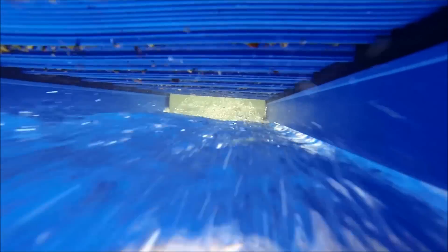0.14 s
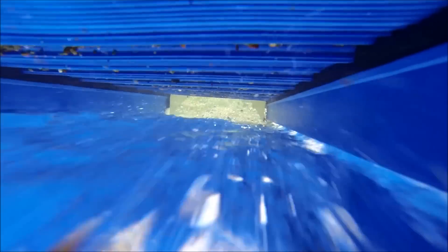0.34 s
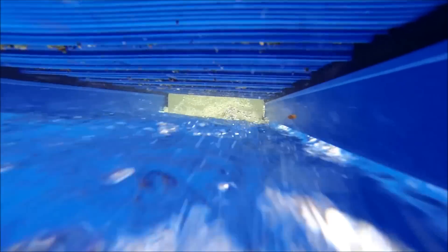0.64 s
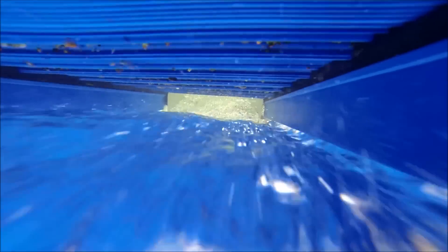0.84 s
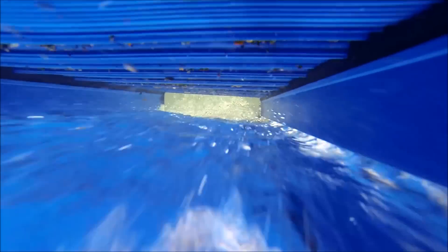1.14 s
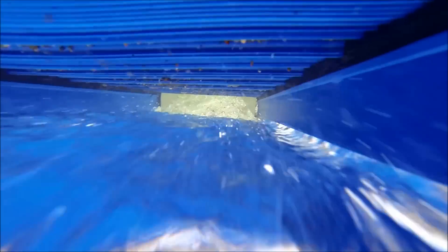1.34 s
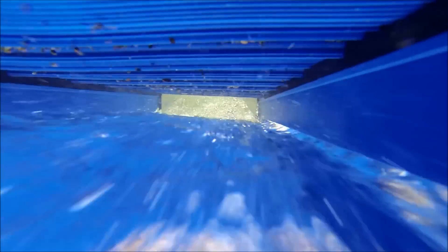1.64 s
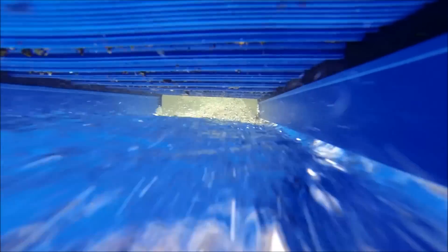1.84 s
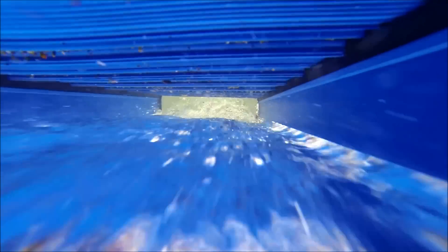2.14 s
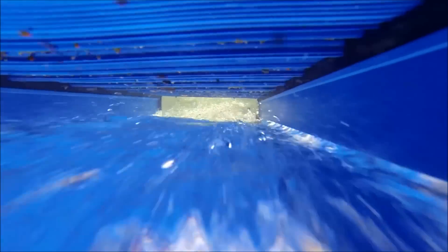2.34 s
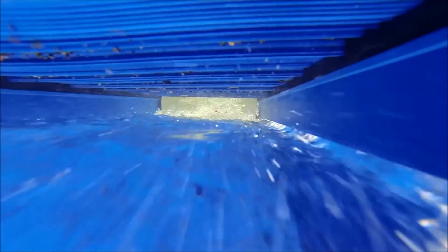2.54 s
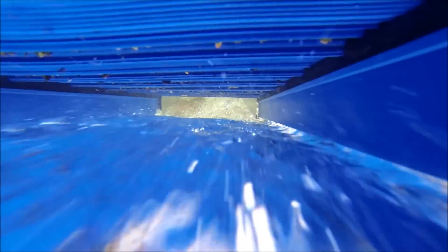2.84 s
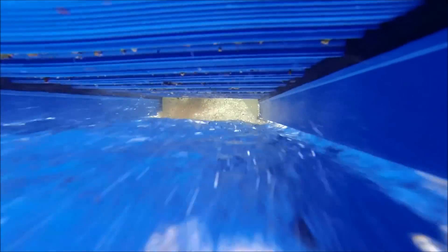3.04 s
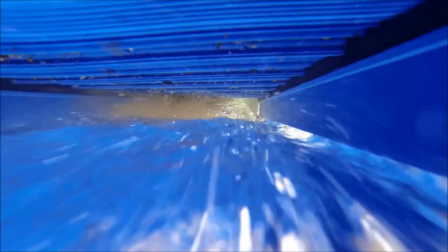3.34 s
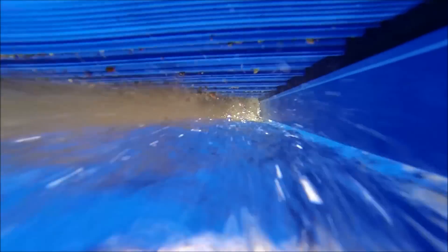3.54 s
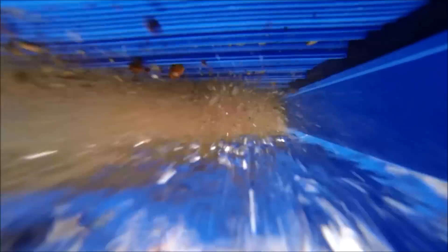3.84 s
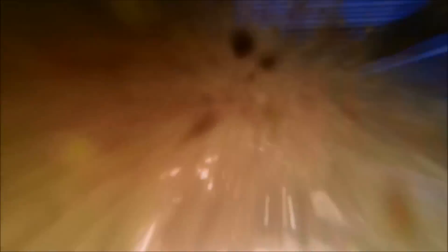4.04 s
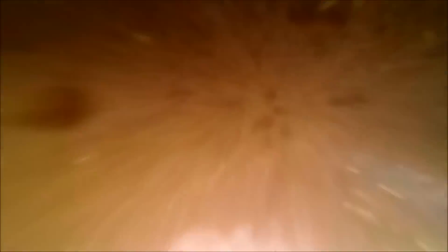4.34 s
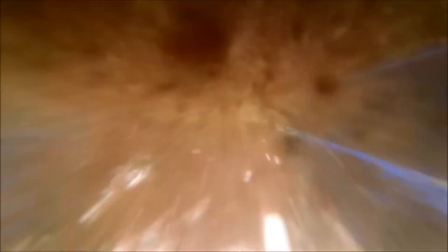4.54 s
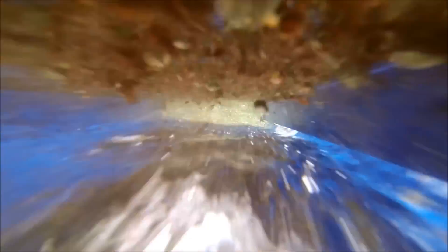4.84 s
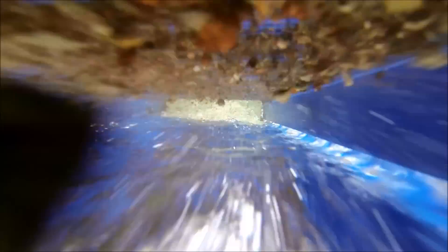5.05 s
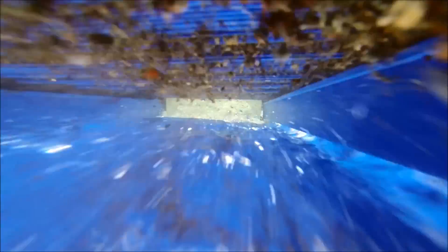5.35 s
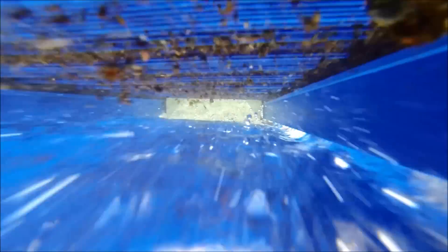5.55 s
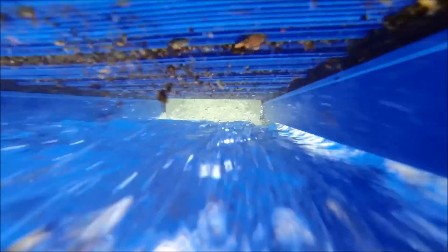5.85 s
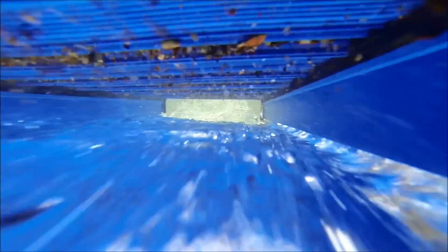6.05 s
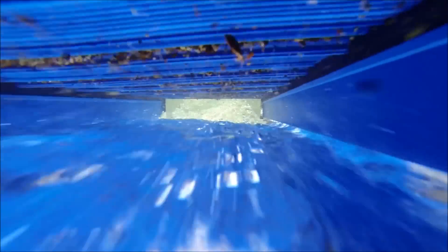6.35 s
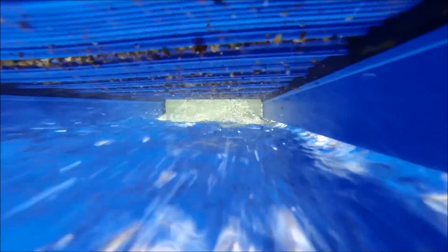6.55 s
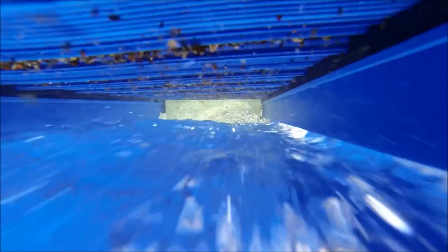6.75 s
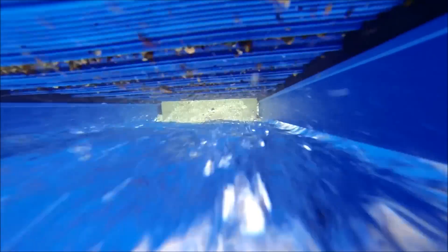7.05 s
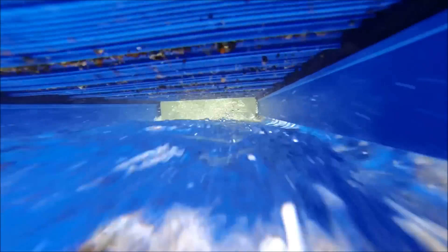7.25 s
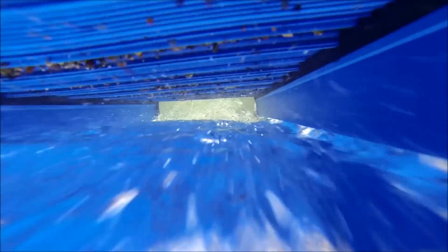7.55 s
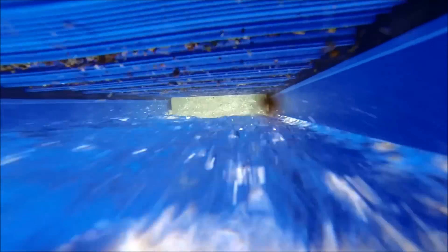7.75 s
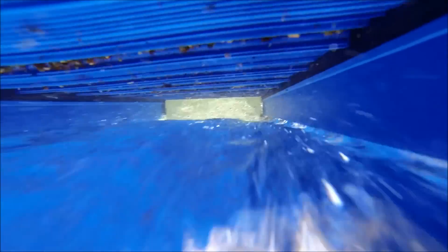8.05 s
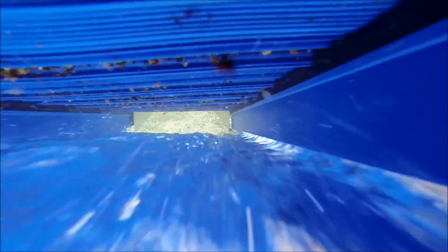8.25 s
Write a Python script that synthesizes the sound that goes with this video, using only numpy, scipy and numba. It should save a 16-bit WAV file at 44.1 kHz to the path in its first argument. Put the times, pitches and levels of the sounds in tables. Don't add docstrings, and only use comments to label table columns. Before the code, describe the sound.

Steady gurgling torrent over fizzing sand, then a burst of hard stone knocks against a sealed housing, then ever louder bubble bursts.

```python
import sys
import numpy as np
from scipy import signal
from scipy.fft import rfft, irfft, next_fast_len
from scipy.io import wavfile
from scipy.ndimage import uniform_filter1d, map_coordinates
from numba import njit

SR = 44100
rng = np.random.default_rng(int(sys.argv[2]) if len(sys.argv) > 2 else 0)


def digitize_waveform(pressure):
    field = np.atleast_2d(pressure).T
    bounded = np.clip(field, -1, 1)
    quanta = np.round(bounded * 32767).astype(np.int16)
    wavfile.write(sys.argv[1], SR, quanta)


def voltage_ratio(level):
    return 10 ** (np.asarray(level, float) / 20)


N = 370437

# frequency in Hz, level in dB per Hz.
CASE_COLOUR = [(350, -31), (600, -9), (843, -1.5), (1440, 1.5), (1950, -10.5), (2340, -10), (2740, -17.5),
               (3280, -16), (4900, -37), (7860, -45), (11700, -47.5), (19800, -120)]
# frequency in Hz, level in dB per Hz.
GRIT_COLOUR = [(1060, -3.5), (1800, 7.5), (2620, 2.5), (3260, 4), (4450, -6.5), (5010, -4.5), (6960, -14.5),
               (7910, -12.5), (10500, -23.5), (12800, -20.5), (16000, -31)]
# time in seconds, sand load in dB.
SAND_LOAD = [(0, -51.5), (.56, -43), (2.05, -48.5), (2.3, -43), (3.45, -45), (3.85, -51), (3.96, -40),
             (4.3, -35.5), (4.87, -33.5), (5.1, -36.5), (5.76, -39.5), (6.22, -37), (6.97, -41.5),
             (7.39, -38.5), (7.64, -47.5), (7.94, -33), (8.04, -36), (8.4, -38)]


def unit(x):
    return x / np.sqrt(np.mean(x ** 2) + 1e-20)


def wobble(knots_per_s):
    knots = rng.standard_normal(int(N * knots_per_s / SR) + 4)
    return map_coordinates(knots, [np.arange(N) * knots_per_s / SR])


def swing(rows):
    curve = np.interp(np.arange(N) / SR, *np.transpose(rows))
    return curve - curve.mean()


def coloured(x, points):
    m = 2 ** 14
    hz, db = np.transpose(points)
    level = voltage_ratio(np.interp(np.log(np.fft.rfftfreq(m, 1 / SR) + 1), np.log(hz + 1), db))
    cepstrum = irfft(np.log(level + 1e-6), m)
    cepstrum[1:m // 2] *= 2
    cepstrum[m // 2 + 1:] = 0
    impulse = irfft(np.exp(rfft(cepstrum)), m)
    return signal.oaconvolve(x, impulse)[:N]


def mottled(x, patchy_db):
    z = signal.stft(x, nperseg=128)[2]
    field = uniform_filter1d(rng.standard_normal(z.shape), size=6, axis=0)
    field = uniform_filter1d(field, size=3, axis=1)
    return signal.istft(z * voltage_ratio(patchy_db * unit(field)), nperseg=128)[1][:N]


@njit
def rings(n, start, step, gain, cycles, rise, soft, bend):
    out = np.zeros(n)
    for g in range(len(start)):
        for i in range(min(int(4 * cycles[g] / step[g]), n - start[g])):
            u = i * step[g]
            shape = np.exp(-(u / cycles[g]) ** bend) * (1 - np.exp(-u / soft))
            out[start[g] + i] += gain[g] * shape * np.sin(2 * np.pi * u * (1 + rise * u / cycles[g]))
    return out


def struck(rows, cycles, rise, soft, bend):
    s, db, hz = np.transpose(rows)[:3]
    draw = rng.random((len(s), 2))
    gain = voltage_ratio(db) * np.sign(draw[:, 0] - .5)
    length_cycles = cycles * (0.69 + .5 * draw[:, 1])
    return rings(N, (s * SR).astype(np.int64), hz / SR, gain, length_cycles, rise, soft, bend)


def near(rows, hz, spread):
    scatter = rng.uniform(-1.94, 1.84, len(rows))
    return [(s, db, hz * (1 + spread * r)) for (s, db), r in zip(rows, scatter)]


def shower(rate_per_s, low_hz, high_hz, cycles, spread_db, most_db, rise):
    draw = rng.random((int(rate_per_s * N / SR), 3))
    hz = low_hz * (high_hz / low_hz) ** draw[:, 1]
    size_db = np.minimum(-spread_db * np.log(draw[:, 2] + 1e-9), most_db) + 20 * np.log10(hz)
    rows = np.transpose([draw[:, 0] * N / SR, size_db, hz])
    return unit(struck(rows, cycles, rise, soft=0.41, bend=0.96))


def bursts(rows, decay_s):
    blows = np.bincount([round(r[0] * SR) for r in rows], [voltage_ratio(r[1]) for r in rows], N)[:N]
    envelope = signal.lfilter([1], [1, -np.exp(-1 / (decay_s * SR))], blows)
    return envelope * np.sign(rng.standard_normal(N))


def turbulence():
    # time in seconds, turbulence in dB.
    flow = [(0.0, -24), (0.63, -18), (1.19, -20.5), (1.85, -20), (2.03, -21.5), (2.32, -18.5), (2.5, -20),
            (4.37, -16.5), (4.58, -17), (4.91, -15.5), (5.05, -19.5), (5.21, -21.5), (5.54, -18),
            (5.76, -21), (5.96, -18), (6.29, -17), (8.21, -18.5), (8.4, -19.5)]
    return swing(flow)


def gravel_bar():
    t = np.arange(N) / SR
    start_s, end_s, rise_s, fall_s = 4.55, 6.22, 0.15, 0.58
    return np.clip(np.minimum((t - start_s) / rise_s, (end_s - t) / fall_s) + .5, 0, 1)


def splashes():
    draw = rng.random((int(70 * N / SR), 2))
    rows = np.transpose([draw[:, 0] * (N - 1) / SR, 14 * draw[:, 1] ** 2])
    return unit(bursts(rows, decay_s=0.0026))


def buffeting(flow_db, bar, surge, heave):
    # frequency in Hz, level in dB per Hz.
    eddy_colour = [(8.8, -23), (15, 2), (37, 0), (81, -5), (145, -14.5), (242, -26.5), (390, -37),
                   (660, -120)]
    rumble = coloured(rng.standard_normal(N), eddy_colour)
    eddies = unit(voltage_ratio(1.44 * heave + 1.0 * surge) * rumble)
    return voltage_ratio(-21 + 0.99 * flow_db - 5 * bar) * eddies


def sloshing(flow_db, bar, surge, heave, splash):
    # frequency in Hz, level in dB per Hz.
    slosh_colour = [(76, -32), (130, -6.5), (242, -7.5), (650, -4), (840, -44), (1430, -120)]
    pockets = shower(400, 100.0, 867, 1.27, spread_db=2.0, most_db=13.0, rise=0.061)
    pockets = pockets + 0.9 * rng.standard_normal(N) + 2.06 * splash
    slosh = unit(voltage_ratio(0.53 * heave + 2.4 * surge) * coloured(pockets, slosh_colour))
    return voltage_ratio(-24 + 0.46 * flow_db - 6 * bar) * slosh


def gurgling(flow_db, bar, surge, heave, splash):
    froth = shower(1800, 413.0, 10640, 4.52, spread_db=2.5, most_db=8.5, rise=0.0554)
    froth = froth + 0.6 * rng.standard_normal(N) + 0.53 * splash
    flutter_db = 0.39 * heave + 1.8 * surge + 1.07 * wobble(90)
    bubbles = unit(voltage_ratio(flutter_db) * coloured(froth, CASE_COLOUR))
    bubbles = bubbles - 0.5 * bar * signal.filtfilt(*signal.butter(2, 950, fs=SR), bubbles)
    return voltage_ratio(-14.5 + flow_db - 0.3 * bar) * bubbles


def drifting_sand(surge, splash):
    sand_db = -40.5 + 0.99 * swing(SAND_LOAD)
    thick = np.clip((sand_db + 46.0) / 14, .15, 1)
    hits = rng.random((int(650 * N / SR), 2))
    size_db = np.minimum(-6.5 * np.log(hits[:, 1] + 1e-9), 14)
    rows = np.transpose([hits[:, 0] * (N - 1) / SR, size_db])
    cracks = unit(mottled(bursts(rows, decay_s=0.00044), patchy_db=4))
    fizz = shower(450, 2890, 17500, 7.9, spread_db=11.5, most_db=24.0, rise=0.044)
    drops = shower(90, 3086, 8500, 8.5, spread_db=6.5, most_db=10.0, rise=0.013)
    sand = 1.8 * thick * cracks + (1 - 0.7 * thick) * (1.5 * fizz + 0.86 * drops)
    sand = sand + (0.13 + 0.25 * thick) * rng.standard_normal(N) + 0.095 * splash
    sand = unit(voltage_ratio(1.36 * surge) * coloured(sand, GRIT_COLOUR))
    return voltage_ratio(sand_db + 11.0) * sand


def water():
    flow_db, bar, splash = turbulence(), gravel_bar(), splashes()
    surge, heave = wobble(25), wobble(11)
    low = buffeting(flow_db, bar, surge, heave) + sloshing(flow_db, bar, surge, heave, splash)
    return low + gurgling(flow_db, bar, surge, heave, splash) + drifting_sand(surge, splash)


def lesser_bubbles():
    # start in seconds, peak in dB, pitch in Hz.
    blips = [(0.3236, -6, 1270), (0.4015, -7, 1330), (0.5074, -0.5, 1460), (0.8458, -9, 1480),
             (0.8608, -13, 1370), (1.0057, -2, 1240), (1.1233, -10, 1320), (1.4343, -9, 710),
             (1.5258, -4, 1310), (1.5341, -2, 1390), (1.8323, -7, 1340), (1.9378, -13, 1040),
             (1.9763, -3, 1160), (2.0484, -2, 930), (2.1925, -1, 1280), (2.2309, -2, 1310),
             (2.5259, -7, 1500), (2.5372, -6, 1180), (2.7679, -3, 1233), (2.8774, -11, 1040),
             (2.9031, -10, 1300), (3.0326, -7.5, 1596), (3.0612, -6, 830), (3.3625, -5, 1350),
             (3.6904, -3, 1390), (3.7741, -9, 1327), (3.8377, -9, 1520), (4.0962, 2, 1320),
             (4.5591, 0, 1550), (5.0368, -1, 1500), (4.9655, -2, 1200), (5.0722, -6, 1500),
             (5.3164, -8, 1520), (5.4015, -12, 1460), (5.4752, -3, 1670), (5.7442, -2, 1500),
             (5.8697, -6, 1300), (6.1295, -10, 1270), (6.359, -5, 1560), (6.6197, -1, 1022),
             (7.0508, 0, 945), (5.6105, -7, 1200), (7.4424, -7, 929), (7.8085, -6, 1170),
             (7.9373, -5, 1460), (8.0578, -4, 1400), (8.0656, -3, 1570), (8.1995, -2, 1230),
             (8.3178, -5, 1220), (8.3285, 1.5, 1429)]
    # start in seconds, peak in dB, pitch in Hz.
    glugs = [
        (0.4377, -9, 715),
        (0.7547, -6.5, 640),
        (0.9895, -17, 423),
        (2.3813, -9, 644),
        (4.9011, -17, 407),
        (5.3949, -19, 510),
        (5.7033, 10.5, 1230),
        (6.8606, -14, 370),
        (6.9831, -13, 507),
        (8.3078, -11, 710),
    ]
    blip_rings = voltage_ratio(5.5) * struck(blips, 4.05, rise=0.0074, soft=1.0, bend=1.36)
    return blip_rings + voltage_ratio(6.0) * struck(glugs, 3.1, rise=0.022, soft=0.9, bend=2.2)


def fine_grit():
    # start in seconds, peak in dB, pitch in Hz.
    taps = [(0.0802, -11, 1800), (0.1224, -13, 1900), (0.3838, -7, 2610), (0.5939, -13, 2150),
            (1.3448, -5.5, 2070), (1.4239, -11, 2100), (1.4625, -14.2, 2200), (1.5991, -12, 2450),
            (1.6526, -4, 2190), (1.8579, -7, 2300), (1.893, -2, 1890), (2.1264, -9, 3260),
            (2.6521, -7, 2720), (1.3185, -17, 3080), (3.218, -6, 2300), (3.3001, -8, 2370),
            (3.4091, -7, 1860), (3.6266, -10, 1810), (3.7711, -7, 3000), (4.17, -17, 2400),
            (4.306, -4, 2500), (4.322, -6, 3200), (4.5638, -5, 2270), (4.607, -4, 2337),
            (4.8204, -15, 1810), (4.966, -15, 2630), (5.5204, -14.3, 1810), (5.7802, -8, 1811),
            (5.9549, -7, 1990), (6.1194, -8, 1980), (6.1474, -9, 1840), (6.2158, -7, 1860),
            (6.3163, -14, 2100), (6.3858, -7, 2202), (6.85, -8, 2297), (7.2438, -5, 1800),
            (7.3395, -9, 1840), (7.4072, -14, 2000), (7.4963, -5, 2020), (7.9392, -7, 2060)]
    # start in seconds, peak in dB, pitch in Hz.
    grains = [(0.3784, -21, 3910), (0.4019, -21, 4050), (0.782, -19, 4040), (0.9045, -15, 3990),
              (1.0023, -23, 3680), (1.1966, -16, 3850), (1.4777, -20, 4930), (1.6867, -21, 4150),
              (1.2445, -15, 4200), (1.8942, -25, 5040), (1.9319, -19.5, 3970), (1.9675, -23.8, 4630),
              (2.2728, -22, 10760), (2.4578, -22, 5340), (2.6532, -16, 4390), (1.353, -25, 5360),
              (3.4417, -19, 4080), (3.7717, -14, 3820), (3.8524, -24, 5270), (3.9317, -20, 4970),
              (3.9404, -21, 3610), (3.9711, -22, 5170), (4.0305, -15, 3620), (4.0474, -18, 4870),
              (4.0601, -16.5, 4970), (4.1227, -17, 3940), (4.1708, -17.5, 4190), (4.243, -18.6, 11600),
              (4.3052, -21, 4040), (4.3294, -14, 4870), (4.3959, -18, 8000), (4.4356, -12, 4890),
              (4.459, -13, 4780), (4.8243, -17, 5350), (4.8738, -15, 3900), (4.9545, -13, 4140),
              (5.0368, -9, 3100), (5.4763, -16, 3610), (5.5314, -20.2, 3880), (5.6371, -6, 3680),
              (5.7814, -14, 3610), (5.8981, -17, 4950), (5.9274, -10, 4150), (6.0984, -12.5, 3980),
              (6.1478, -21, 5000), (6.1632, -17, 4035), (6.2714, -23, 5070), (6.2976, -20, 4270),
              (6.3661, -15, 3700), (6.3874, -14.5, 3680), (6.4242, -16.5, 4960), (6.7762, -12, 4260),
              (6.8844, -16, 4520), (7.1458, -21, 5050), (7.384, -23, 4210), (7.4783, -19, 5140),
              (7.7104, -18.5, 5320), (7.7872, -15, 3610), (7.8926, -17, 4400), (8.0676, -23, 4890)]
    # start in seconds, peak in dB, pitch in Hz.
    glints = [(0.1387, -29, 8030), (0.5596, -29.2, 10000), (2.386, -30, 11500), (5.2915, -19, 12500),
              (7.569, -29, 11500), (7.652, -30, 6000), (4, -25, 12500), (2.2415, -28, 10990),
              (2.3175, -26, 7800), (2.4971, -29.7, 11540), (5.5092, -22, 11700), (7.5375, -26, 12500),
              (7.6615, -34, 14000), (5.3545, -30, 9000), (3.4447, -27, 10690), (3.4583, -29.3, 10720),
              (4.3825, -21, 9000), (4.7335, -20, 11000), (4.5764, -20, 7010), (4.6753, -6.5, 7800),
              (4.2, -21, 10700), (5.7365, -24, 11500), (4.9756, -14.5, 7300), (5.7592, -31, 12800),
              (5.432, -23, 11700), (5.7896, -24, 10500), (5.773, -14, 12400), (5.7815, -28.3, 8100),
              (5.949, -19, 12140), (6.1954, -28, 8100), (6.2024, -23, 9400), (6.227, -24, 7900),
              (6.2865, -23.7, 11070), (6.439, -26, 10600), (7.4152, -22, 10490), (7.7365, -29, 8700),
              (7.7823, -29, 8110), (8.26, -25, 9000)]
    ring = voltage_ratio(5.0) * struck(taps, 5.1, rise=0.004, soft=0.75, bend=0.84)
    ring += voltage_ratio(8.5) * struck(grains, 5.9, rise=0.004, soft=1.3, bend=1.1)
    ring += voltage_ratio(12.5) * struck(glints, 5.2, rise=0.003, soft=1.1, bend=1.8)
    crack = mottled(bursts(grains + glints, decay_s=0.0011), patchy_db=5.5)
    crack_db = 11.5 + 0.47 * np.minimum(swing(SAND_LOAD) - 7.5, 0)
    return ring + voltage_ratio(crack_db) * coloured(crack, GRIT_COLOUR)


def shoves():
    # start in seconds, peak in dB, recovery in seconds.
    pushes = [
        (5.7736, 4.5, 0.0023),
    ]
    out, t = np.zeros(N), np.arange(N) / SR
    for s, db, recovery_s in pushes:
        u = np.maximum(t - s, 0) / recovery_s
        jump = (1 - np.exp(-u * 4)) ** 2
        out -= voltage_ratio(db + 16.5) * jump * (np.exp(-u) - 0.17 * np.exp(-u / 5.1))
    return out


def gravel_strikes():
    # start in seconds, peak in dB, pitch in Hz, crack in dB.
    ticks = [(0.3002, -7, 2540, -28), (0.3774, -2, 2370, -44), (1.104, -7, 2330, -36),
             (1.15, -12, 3220, -27), (1.1654, -5, 2560, -17), (1.1888, -7.5, 3000, -11.5),
             (1.6005, -6, 2480, -21), (2.637, -8, 2440, -24), (2.6466, -7.5, 2535, -10),
             (2.8849, -6, 2600, -17), (3.035, -3.5, 3290, -33), (3.127, -2, 2300, -22),
             (3.152, -5, 2400, -20), (3.208, -4.5, 2370, -41), (3.7595, -6.5, 2820, -33),
             (3.8616, -7, 2400, -31), (4.0043, -5, 3150, -28), (4.0805, -5, 2290, -17),
             (4.2953, -6, 2320, -35), (4.351, -10.5, 2280, -2), (4.572, 5.5, 3020, -20),
             (6.4158, -5.5, 2350, -28), (6.812, -7.5, 2790, -15), (6.987, -7, 2540, -35),
             (7.37, -6.5, 2950, -35), (7.53, -2, 2370, -34), (7.7743, -10, 3400, -15),
             (8.2529, -5, 2550, -9.5), (8.308, -3.5, 3220, -27), (8.3553, -1, 3470, -37)]
    # start in seconds, peak in dB, pitch in Hz.
    sparks = [(.2315, -19, 10500), (.5906, -23.5, 5820), (.6567, -19.5, 7570), (.817, -18.5, 6500),
              (1.0087, -15.5, 6160), (1.097, -23, 5950), (1.1654, -15, 7100), (1.5454, -21, 7750),
              (1.6148, -16, 6000), (1.7074, -18, 5740), (1.8516, -18, 6170), (2.129, -19, 5540),
              (2.5911, -17.5, 6000), (3.0734, -15.5, 7200), (3.3776, -17.5, 7600), (3.594, -20, 5650),
              (3.768, -21, 12500), (3.8088, -22, 7240), (4.3505, -13, 5700), (4.3891, -15, 12000),
              (5.0552, -19, 12500), (4.707, -17, 6270), (4.7245, -7, 6510), (4.9052, -9, 5720),
              (5.1625, -16.5, 5920), (5.302, -14, 12000), (5.5058, -12, 6480), (6.7171, -18.5, 7940),
              (7.5295, -17, 10100), (8.301, -17, 5370)]
    # start in seconds, peak in dB, crack in dB.
    pebbles = [(4.67, -4, -2.5), (4.7255, -14.5, 0), (4.7758, 0, -16.5), (4.922, -6, -10), (4.966, -6, -18),
               (4.99, 9, -17), (5.004, 8.5, -23), (5.045, 7, -16), (5.0621, 9, -28), (5.08, 11, -19.5),
               (5.0916, 8, -30), (5.223, -6, -11), (5.476, 1, -20), (5.522, -10, -10), (5.629, -6.5, -11)]
    # start in seconds, knock, tick and spark in dB.
    stones = [(0.059, -8, -31, -36), (4.641, -11, -10, -15.5), (4.674, -22, -5, -4.5),
              (4.8745, 6.5, -9, -29), (4.954, -22, -4, -18), (4.977, 11, -19, -8), (5.0405, 11.5, -11, -12),
              (5.0658, 8, -1, -14), (5.129, -20, -9, -21), (5.22, -1, -28, -12.5), (5.266, 3.5, -3.5, -13),
              (5.4116, -12, -18, -11), (5.4329, -17, -28, -17), (5.4669, -2, -16, -6),
              (5.5135, -17, -2, -11.5), (5.6378, 3.5, -5, -15), (5.6765, -8, -8, -12),
              (5.702, 13.5, 7.5, -6), (5.729, -25, -25, -17), (5.7422, 3, -3, -22), (5.7737, -3, -7, -2.5),
              (5.802, -2, -8, -16), (5.899, 0, -3, -14), (5.947, -9, -12, -12), (5.964, 7.5, 0, -14),
              (7.0358, 2, -12, -7), (7.0612, 6, -1, -16)]
    knock = near([(r[0], r[1]) for r in stones], 1423, spread=0.05)
    tick = near([(r[0], r[2]) for r in stones], 3100, spread=0.05)
    spark = near([(r[0], r[3]) for r in stones], 5970, spread=0.05)
    ring = voltage_ratio(4.0) * struck(knock, 2.7, rise=0.0077, soft=0.49, bend=3.6)
    ring += voltage_ratio(5.5) * struck([r[:3] for r in ticks] + tick, 4.15, rise=0.0031, soft=0.45, bend=0.86)
    ring += voltage_ratio(3) * struck(sparks + spark, 7, rise=.005, soft=1.5, bend=2)
    bounces = [(s, db, 1450) for s, db, _ in pebbles]
    ring += voltage_ratio(-1.0) * struck(bounces, 3.3, rise=0.01, soft=0.48, bend=1.4)
    snap_s = .0008
    bright = [(s, db + crack_db) for s, db, *_, crack_db in ticks + pebbles]
    snaps = bursts(bright, snap_s) + .5 * bursts(sparks, snap_s) + 0.83 * bursts(spark, snap_s)
    crack = voltage_ratio(18.5) * coloured(mottled(snaps, patchy_db=4), GRIT_COLOUR)
    shaken_case = voltage_ratio(10.5) * coloured(bursts(ticks + tick, decay_s=0.0034), CASE_COLOUR)
    return ring + crack + shaken_case


def bubble_bursts():
    # start in seconds, peak in dB, pitch in Hz.
    gulps = [(.142, -3, 1030), (.149, -1, 840), (.666, 2, 1160), (1.356, -1.5, 1020), (1.421, -3, 1220),
             (1.583, -4.5, 830), (1.939, 0.5, 1040), (2.034, 6, 960), (2.187, 6.5, 880), (2.272, -2, 754),
             (2.315, -1.5, 865), (2.519, -6, 820), (2.725, 1, 794), (2.792, -1, 880), (3.095, 3.5, 1020),
             (3.525, 2, 697), (3.667, 1, 795), (3.823, -2, 1050), (3.863, -2, 1130), (4.556, -6, 1000),
             (6.518, 6, 1057), (6.632, 1.5, 945), (6.653, 2, 810), (6.762, 3, 950), (6.826, 6, 890),
             (7.245, 7.5, 990), (7.527, 3.5, 910), (7.553, -3, 1050), (7.8, 8.5, 870), (7.986, 13, 1010),
             (.995, -4, 1280),
        (2.042, 6.5, 1450),
        (2.242, -2, 1380),
        (5.782, 3, 1530),
    ]
    # start in seconds, peak in dB.
    slaps = [(.081, -2.5), (.169, 8), (.26, 2.5), (.466, 1), (.596, -1), (.869, 4), (1.045, 7.5),
             (1.207, 7), (1.471, 5.5), (.0595, -5), (1.644, 5), (1.731, 5), (1.894, 3.5), (2.233, -4),
             (2.401, 1), (2.413, 7), (2.952, 2), (3.41, 0), (3.628, 7), (3.991, 1.5), (4.326, 3),
             (4.609, 2), (6.425, 2), (6.495, 2), (7.5675, 8.5), (7.5988, 6), (7.7268, 5.5), (8.023, 8),
             (8.101, 11), (8.131, 6)]
    # start in seconds, peak in dB, pitch in Hz.
    plops = [(0.042, -11.5, 430), (0.361, -4, 420), (0.555, -4, 480), (0.843, -3, 464), (1.185, -4, 510),
             (1.755, -7, 500), (1.839, -7, 563), (2.027, -6, 430), (2.228, -4, 484), (2.88, -16, 598),
             (3.66, -5.5, 400), (5.034, -13, 200), (5.56, -13, 332), (7.437, -4, 510), (7.566, 2.5, 600),
             (7.795, -4, 525), (7.982, -4, 445), (8.059, -3, 573)]
    rows = gulps + near(slaps, 1337, spread=0.1)
    bursting = voltage_ratio(6.5) * struck(rows, 2.12, rise=0.0028, soft=.7, bend=1.16)
    return bursting + voltage_ratio(1.5) * struck(plops, 1.56, rise=0.0069, soft=0.25, bend=1.0)


def scene():
    mix = water() + lesser_bubbles() + fine_grit() + shoves() + gravel_strikes() + bubble_bursts()
    return mix[None]


@njit
def ducked(x, limit, fall, climb):
    out, peak = np.zeros(len(x)), limit
    for i in range(len(x)):
        out[i] = x[i] * limit / peak
        aim = max(abs(x[i]), limit)
        peak += (aim - peak) * (fall if aim > peak else climb)
    return out


def low_pass(x):
    return signal.sosfilt(signal.butter(12, 16370, fs=SR, output="sos"), x)


def record(dry):
    edge_hz = (14200, 16350)
    fall_s, climb_s = 0.0029, .09
    x = ducked(dry[0], voltage_ratio(-7.5), 1 / (fall_s * SR), 1 / (climb_s * SR))
    x = x + voltage_ratio(-66) * rng.standard_normal(N)
    x = x / (1 + np.abs(x / .99) ** 9) ** (1 / 9)
    m = next_fast_len(N)
    rolloff = np.interp(np.fft.rfftfreq(m, 1 / SR), edge_hz, (1, 0))
    x = irfft(rfft(x, m) * rolloff, m)[:N]
    return low_pass(x[None])


dry = scene()
out = record(dry)
digitize_waveform(out)
```